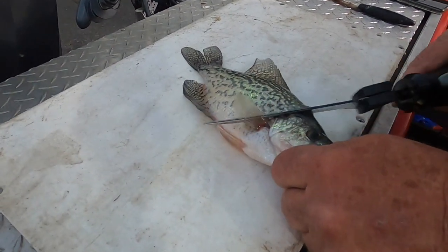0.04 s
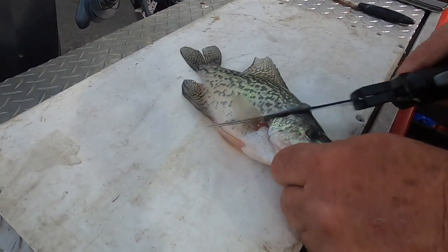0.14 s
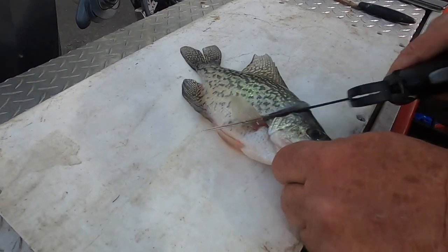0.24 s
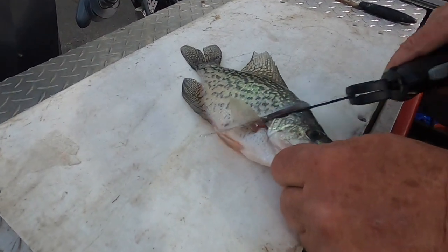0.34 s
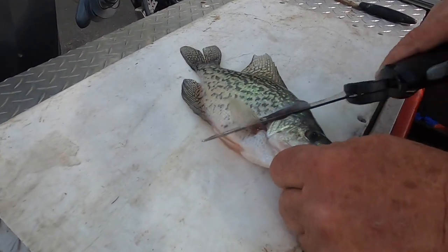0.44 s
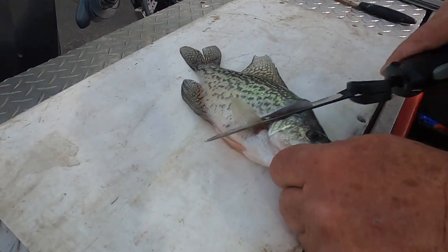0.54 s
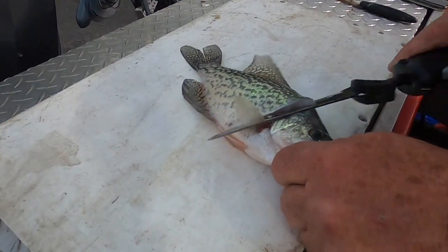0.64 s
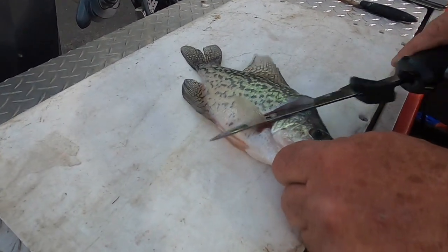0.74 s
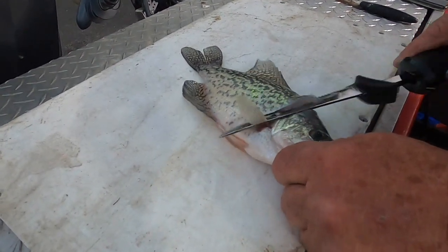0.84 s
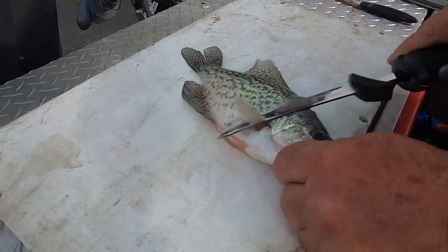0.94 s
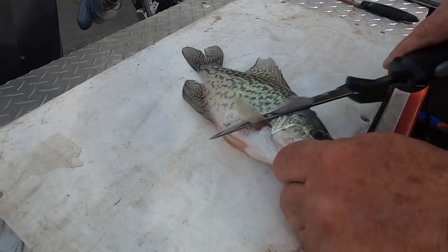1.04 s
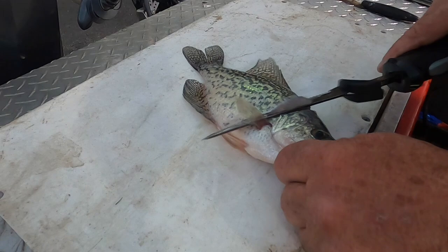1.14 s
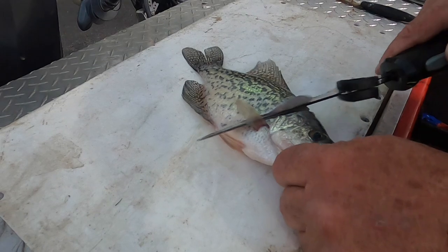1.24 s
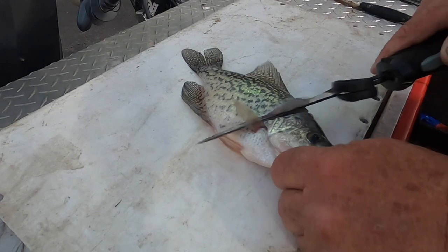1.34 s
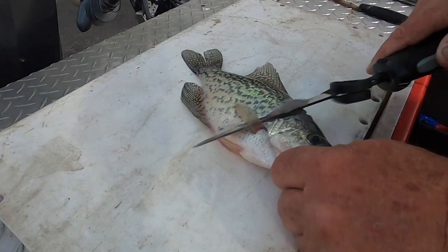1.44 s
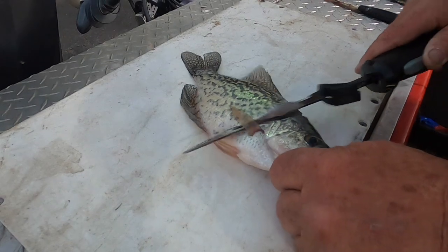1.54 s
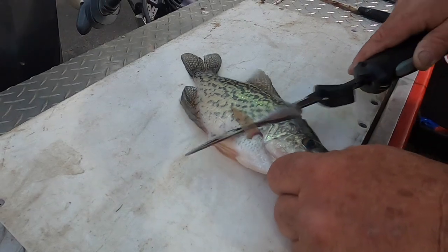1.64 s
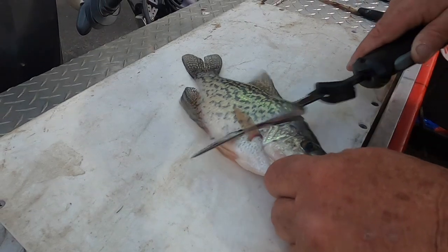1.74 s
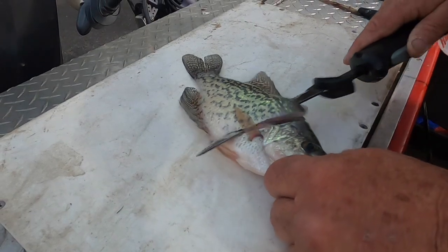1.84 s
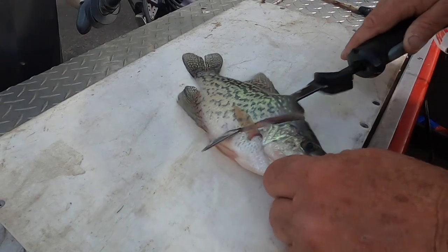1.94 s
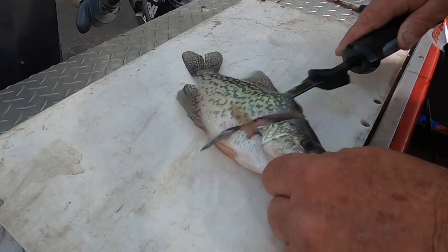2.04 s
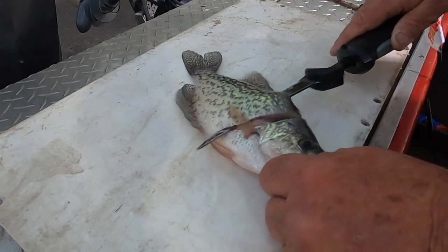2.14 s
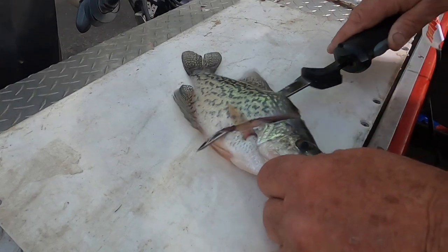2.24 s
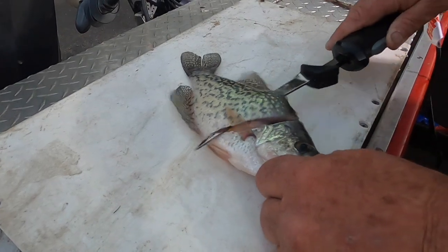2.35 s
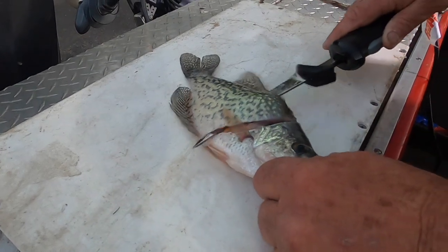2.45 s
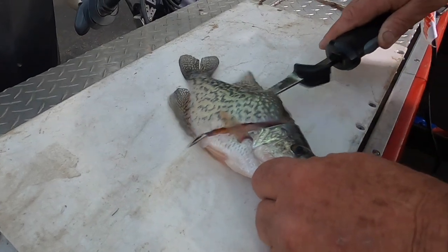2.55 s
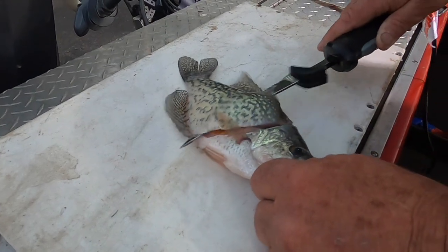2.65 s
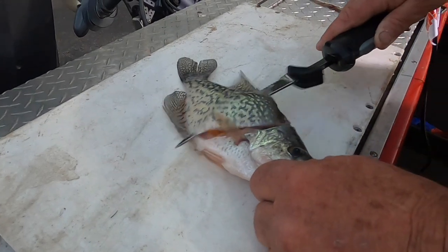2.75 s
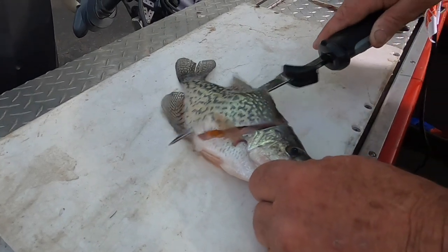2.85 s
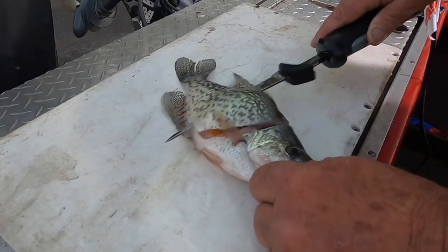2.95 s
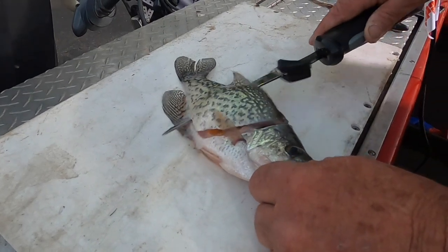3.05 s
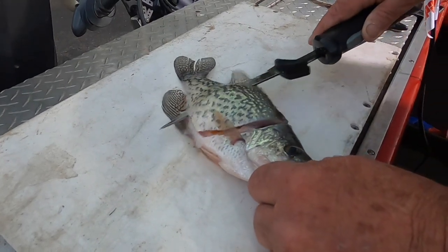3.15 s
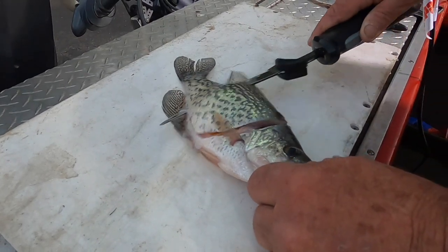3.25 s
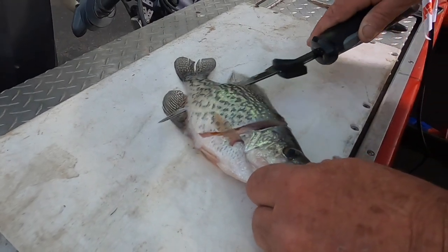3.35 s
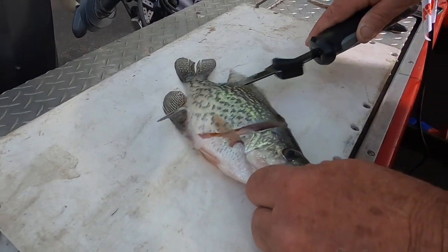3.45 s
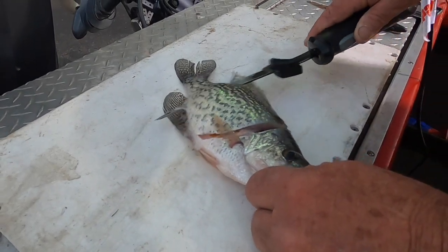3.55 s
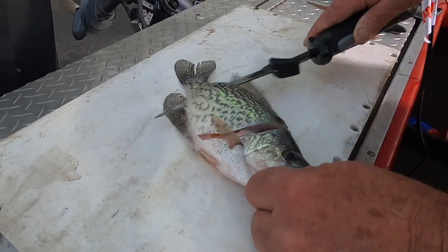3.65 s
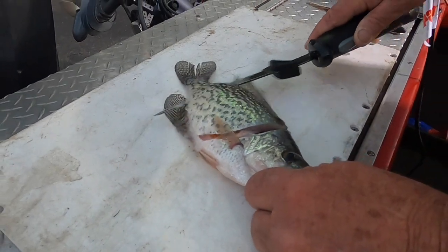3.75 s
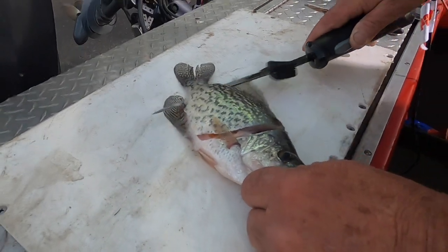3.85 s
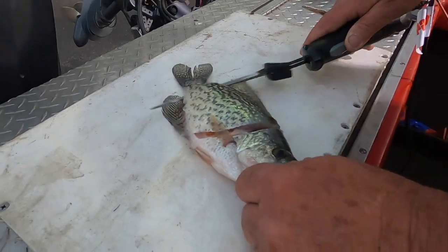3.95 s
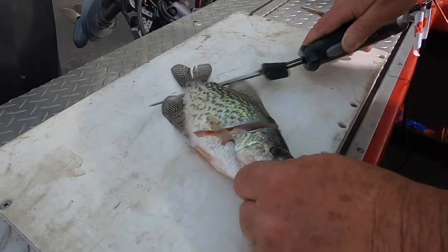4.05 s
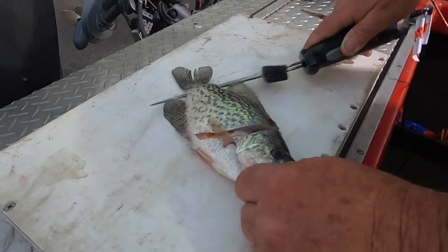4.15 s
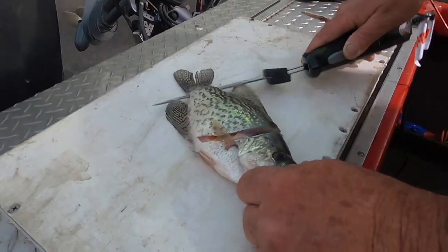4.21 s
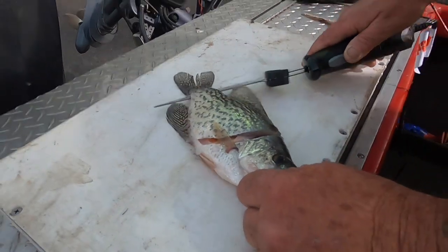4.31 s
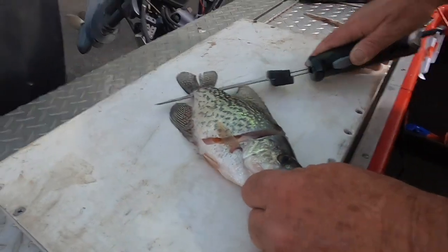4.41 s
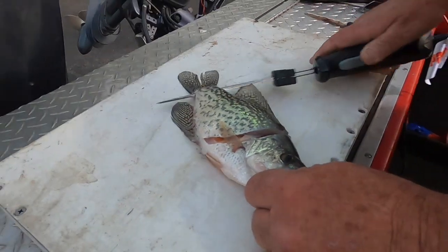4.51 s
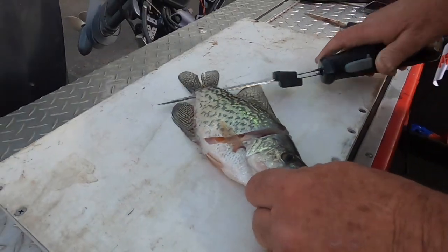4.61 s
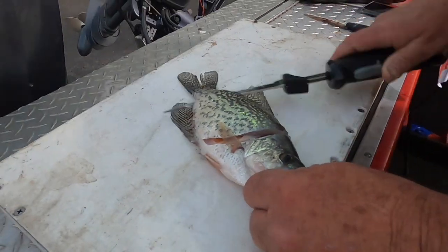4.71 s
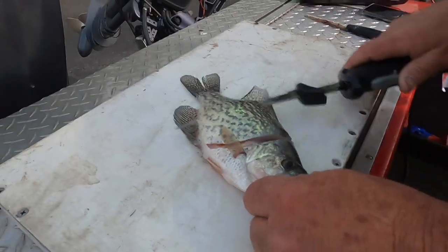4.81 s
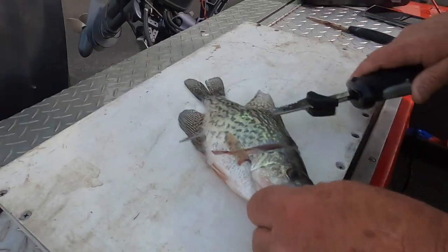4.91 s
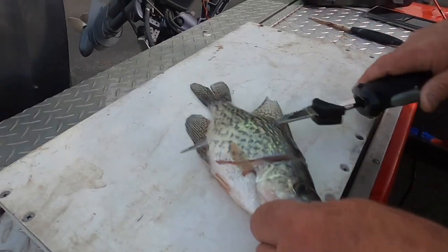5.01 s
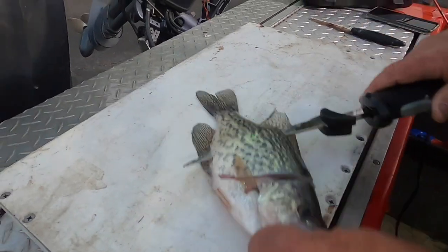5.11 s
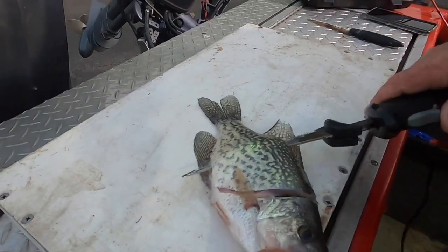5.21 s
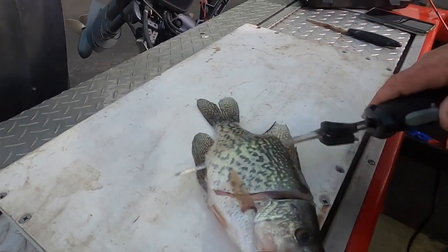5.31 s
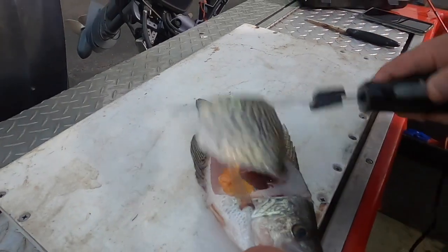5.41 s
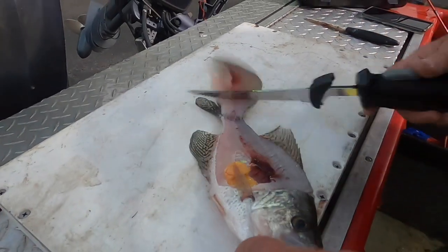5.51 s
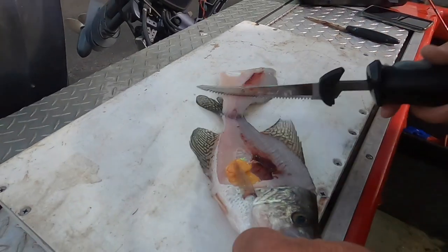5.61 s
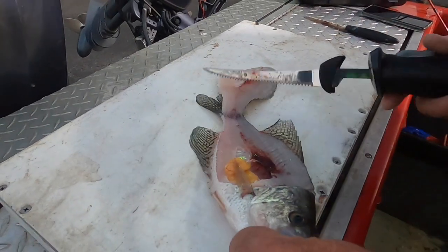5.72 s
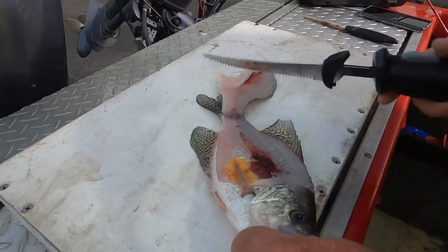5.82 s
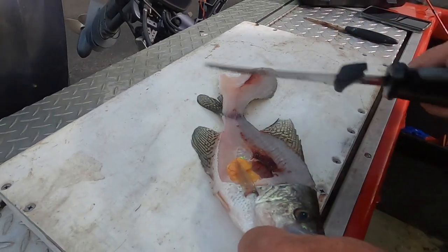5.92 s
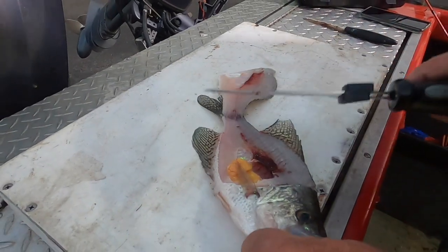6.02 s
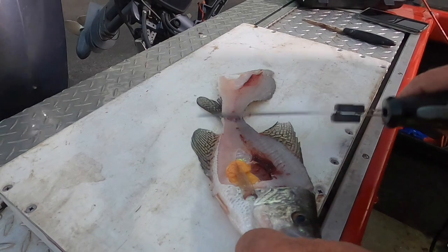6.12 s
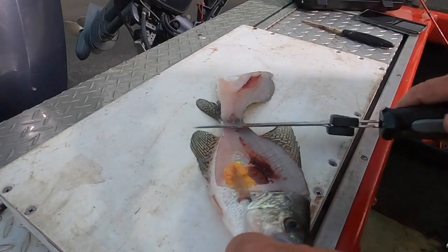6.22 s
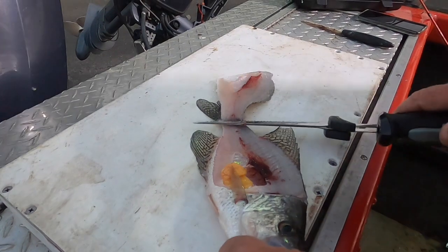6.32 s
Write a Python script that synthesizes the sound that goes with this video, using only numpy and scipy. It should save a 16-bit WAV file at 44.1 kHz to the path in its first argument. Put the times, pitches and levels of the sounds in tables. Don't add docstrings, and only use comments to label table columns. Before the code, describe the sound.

Close up, an electric fillet knife runs with a harsh metallic rattle and gear whine, its twin blades sawing a fish on a hard board. The buzz shifts as the cut deepens, with low thumps and small bony nicks. The motor then winds down, catches and stops. The fillet flips over with sharp wet slaps and dull board bumps, over a faint outdoor hum.

```python
import sys
import numpy as np
from scipy import signal
from scipy.fft import rfft, irfft, next_fast_len
from scipy.io import wavfile

SR = 44100
rng = np.random.default_rng(int(sys.argv[2]) if len(sys.argv) > 2 else 0)


def attenuation_scalar(level_db):
    decades = np.asarray(level_db, float) / 20
    return 10 ** decades


def wrap_up_sound(samples):
    columns = np.atleast_2d(samples).T
    tamed = np.clip(columns, -1, 1)
    steps = np.round(tamed * 32767).astype(np.int16)
    wavfile.write(sys.argv[1], SR, steps)


N = 280917
T = np.arange(N) / SR

# time [s], speed [turns/s].
CAM = [(0, 35.35), (.45, 34.92), (.7, 35.59), (.95, 34.99), (1.45, 34.83), (1.95, 34.3), (2.45, 34.77),
       (2.9, 34.23), (3.25, 34.63), (3.65, 34.46), (4.05, 34.66), (4.58, 35), (4.8, 29.7), (5.0, 23.5),
       (5.35, 13), (6.4, 13)]
# time [s], level [dB], brightness [dB/octave].
EFFORT = [(0, -30, -1), (.15, -30, 0.5), (.5, -29, 0), (.72, -31.5, 0), (.8, -30.5, -1.5), (.9, -29.5, 1.5),
          (1.1, -29.5, 0), (1.3, -29, 1), (1.55, -29.5, .5), (1.75, -29, 1), (2.1, -28.5, 0), (2.5, -28, 0),
          (2.85, -27.5, 0), (3.15, -28, -1), (3.7, -27, -0.5), (4.0, -27.5, 0), (4.3, -28, -1),
          (4.55, -27, 0)]
RUNNING_TURNS_PER_S = 35
BURIED_S = 1.69
SWITCH_OFF_S, SNAG_S, STOP_S = 4.566, 5.015, 5.335


def rms_one(x):
    return x / np.sqrt(np.mean(x ** 2) + 1e-20)


def in_time(rows):
    s, *columns = np.transpose(rows)
    return [np.interp(T, s, c) for c in columns]


def at_hz(points, hz):
    points = np.array(points)
    return np.interp(np.log(hz), np.log(points[:, 0]), points[:, 1])


def after(s, ramp_s=0.013):
    return np.clip((T - s) / ramp_s + .5, 0, 1)


def humps(rows):
    t = T[::16]
    gain = 0
    for s, db, rise, fall in rows:
        drop = np.where(t < s, (s - t) / abs(rise), (t - s) / abs(fall))
        gain = gain + attenuation_scalar(db - 20 * drop)
    return np.interp(T, t, gain)


def drift(rate_hz):
    r = np.exp(-80 * np.pi * rate_hz / SR)
    slow = signal.lfilter([1], [1, -2 * r, r * r], rng.standard_normal(N // 40 + 2002))[2000:]
    return np.interp(np.arange(N) / 40, np.arange(len(slow)), rms_one(slow - slow.mean()))


def band(x, low_hz, high_hz):
    edges_hz = [low_hz, min(high_hz, .45 * SR)]
    return signal.sosfilt(signal.butter(2, edges_hz, "band", fs=SR, output="sos"), x)


def resonate(x, modes):
    out = x.copy()
    for hz, width_hz, level_db in modes:
        r = np.exp(-np.pi * width_hz / SR)
        poles = [1, -2 * r * np.cos(2 * np.pi * hz / SR), r * r]
        out += attenuation_scalar(level_db + 5.0) * signal.lfilter([(1 - r * r) / 2, 0, (r * r - 1) / 2], poles, x)
    return out


def grains(per_s, spread_db):
    draw = rng.uniform(-1, 1, (2, N)) * SR / per_s
    out = np.zeros((2, N))
    born = abs(draw) < 1
    size_db = spread_db * np.minimum(-np.log(abs(draw[born]) + 1e-12), 4)
    out[born] = np.sign(draw[born]) * attenuation_scalar(size_db)
    return rms_one(out)


def sliding(turns, width_hz, gate):
    lowpass = signal.butter(2, width_hz / 2, fs=SR, output="sos")
    along, across = signal.sosfilt(lowpass, gate * grains(6000, spread_db=1.5))
    return rms_one(along * np.cos(2 * np.pi * turns) + across * np.sin(2 * np.pi * turns))


def lagged(left, right):
    lag_s = 52e-6
    size = next_fast_len(N)
    turn = np.exp(-2j * np.pi * np.fft.rfftfreq(size, 1 / SR) * lag_s)
    return np.array([irfft(rfft(left, size) * turn, size)[:N], right])


def coast():
    release_s = 0.14
    halvings = np.log2(RUNNING_TURNS_PER_S / in_time(CAM)[0]) * (T > SWITCH_OFF_S)
    halt_db = 396 * np.clip(T - STOP_S, 0, .3)
    freed, caught = after(SWITCH_OFF_S + release_s / 2, release_s), after(SNAG_S)
    loss_db = -7 * freed - 4 * caught - 13 * halvings - halt_db
    dulling = -0.79 * freed - 0.72 * caught - 0.34 * halvings
    return loss_db, dulling


def reversals(turns, weak_db, scatter_db, sharp):
    stroke = np.floor(2 * turns + .5).astype(int)
    scatter = np.clip(rng.standard_normal(500), -1.5, 1.5)[stroke]
    strength_db = scatter_db * scatter + weak_db * (stroke % 2) * (1.06 + 0.61 * after(BURIED_S, 0.36))
    loaded = 1 - .7 * after(SWITCH_OFF_S + .1, .1)
    angle = 4 * np.pi * turns
    lean = .3
    return attenuation_scalar(loaded * strength_db) * np.exp(loaded * sharp * (np.cos(angle + lean * np.cos(angle)) - 1))


def air():
    # frequency [Hz], level [dB].
    hum_colour = [(59, -46), (100, 6.5), (164, -8.5), (346, -22.5), (630, -14), (859, -18.5), (1060, -13.5),
                  (2180, -28.5), (2680, -36), (8010, -42), (14000, -61.5)]
    chirr_hz = 2700
    mid, side = rng.standard_normal((2, N))
    colour = attenuation_scalar(at_hz(hum_colour, np.fft.rfftfreq(N, 1 / SR) + 1))
    mid, side = rms_one(irfft(rfft([mid, side]) * colour, N))
    hum = (mid + 0.5 * side * [[1], [-1]]) * attenuation_scalar(-50 + 2.0 * drift(3.3))
    chirr_db = -67.5 - 20 * np.clip(6.2 - T, 0, .3) + 3.0 * drift(7)
    return hum + rms_one(band(rng.standard_normal(N), chirr_hz - 70, chirr_hz + 70)) * attenuation_scalar(chirr_db)


def rumble():
    # start [s], peak [dB].
    shakes = [(0.314, -41), (0.437, -46), (0.709, -44), (0.931, -49), (1.146, -46), (1.376, -32),
              (1.644, -29), (1.978, -25), (2.524, -38), (2.682, -33.5), (3.696, -41), (4.17, -44.5),
              (4.385, -30)]
    # time [s], deep level [dB], dull level [dB], lead-in [s per 20 dB].
    bump_rows = [(4.62, -44.5, -38, -0.9), (4.871, -37, -58, 1), (5.03, -44, -60, -1.5), (5.2, -46, -52, 0),
                 (5.361, -46, -57, 0.5), (5.555, -50, -57, 1.5), (5.633, -42, -52, -0.2),
                 (5.65, -25.5, -48, 0), (5.69, -27.5, -48, -0.24), (5.966, -44, -44, 0.12),
                 (6.034, -36, -37.5, 0.07), (6.066, -38, -37, 0.04), (6.112, -27, -30.5, 0),
                 (6.155, -33, -39.5, -0.12), (6.181, -31, -47, -0.5), (6.239, -35.5, -64, -1),
                 (6.315, -34, -62, -1.26)]
    lag_s, rise_s, fall_s = 0.043, 0.086, 0.212
    flex_hz, flex_fall_s, bump_fall_s = 55.5, 0.099, 0.07
    deep, dull = rng.standard_normal((2, N))
    shaken = attenuation_scalar(-48 - 5 * after(SNAG_S, .2))
    shaken = shaken + humps([(s + lag_s, db - 8.0, rise_s, fall_s) for s, db in shakes])
    flex = 0
    for s, db, _, rise in bump_rows:
        flex = flex + humps([(s, db, rise, flex_fall_s)]) * np.cos(2 * np.pi * flex_hz * (T - s))
    dull_gain = attenuation_scalar(-60.5) + humps([(s, db, rise, bump_fall_s) for s, _, db, rise in bump_rows])
    bumps = flex + dull_gain * rms_one(band(band(dull, 47, 188), 40.4, 1350))
    low_end = shaken * rms_one(band(deep, 33.4, 65.0)) + bumps
    apart = attenuation_scalar(-26) * np.roll(low_end, 900)
    return np.array([low_end + apart, low_end - apart])


def lumps():
    # time [s], peak [dB], frequency [Hz].
    jams = [(1.47, -28.5, 105), (1.72, -33, 109), (1.77, -36, 203), (1.97, -32, 170), (2.07, -35, 98.6),
            (2.28, -33, 210.1), (2.4, -30.5, 173), (2.54, -32, 164), (2.69, -31, 104.8), (2.93, -34, 160.1),
            (3.03, -31, 124.6), (3.28, -32.5, 190), (3.38, -31, 127.6), (3.6, -32, 139.7), (3.72, -36, 180),
            (3.95, -33, 140), (4.08, -28, 174.4), (4.16, -25, 158), (4.25, -28.5, 141.3), (4.3, -31.5, 163),
            (4.405, -31, 75)]
    length_s = 0.029
    out = np.zeros(N)
    for s, peak_db, hz in jams:
        span = slice(round((s - .12) * SR), round((s + .12) * SR))
        since = T[span] - s
        out[span] += attenuation_scalar(peak_db + 2.5) * np.exp(-(since / length_s) ** 2) * np.cos(2 * np.pi * hz * since)
    return out


def knocks():
    # time [s], peak [dB], frequency [Hz].
    thuds = [
        (5.96, -33.5, 80),
        (5.995, -37, 130),
        (6.036, -29, 70),
        (6.06, -30, 69.4),
        (6.105, -24, 110),
        (6.117, -19, 75),
        (6.142, -25, 60),
        (6.167, -20, 55),
        (6.227, -32, 65),
    ]
    # time [s], peak [dB], frequency [Hz], pan [dB].
    snaps = [(5.6275, -35, 2500, 0), (5.633, -31, 2000, -6), (5.639, -33, 3000, 0), (5.685, -20.5, 2700, 3),
             (5.688, -27, 2500, -2), (5.692, -23, 3000, -2), (5.693, -31, 2000, 0), (5.731, -37, 3000, -1),
             (5.7575, -44, 6000, 4), (6.034, -47, 500, 0), (6.067, -37, 600, -2), (6.103, -46, 800, 2),
             (6.173, -39, 1000, 0), (6.205, -41, 750, 0), (6.233, -39, 1700, -1), (5.312, -48, 9000, 2),
             (5.429, -53, 6000, -1), (5.4526, -49, 6000, -3), (5.4895, -42, 6000, -2),
             (5.527, -49, 9000, 0), (5.544, -44, 8000, -1), (5.557, -37, 9000, -3), (5.799, -55, 5000, -3),
             (5.893, -56, 4500, -2), (5.963, -56, 3000, 1), (6.051, -55, 3000, 0), (6.0906, -43, 7000, -1),
             (6.165, -47, 4500, 0), (6.2, -55, 6500, 0), (6.246, -50, 4500, -2), (6.312, -55, 8000, 0),
             (6.3425, -53, 7000, 1)]
    thud_t60_s = 0.087
    out = np.zeros((2, N))
    for s, peak_db, hz in thuds:
        since = T[:SR // 8]
        thud = attenuation_scalar(peak_db + 1.5 - 60 * since / thud_t60_s) * np.sin(2 * np.pi * hz * since)
        out[:, round(s * SR):][:, :SR // 8] -= thud
    for s, peak_db, hz, pan_db in snaps:
        snap = band(band(np.arange(400) == 0, hz / 3, 1.5 * hz), hz / 8, 1.7 * hz)
        gain = attenuation_scalar([[peak_db + pan_db / 2], [peak_db - pan_db / 2]])
        out[:, round(s * SR):][:, :400] += snap / snap.max() * gain
    return out


def slaps():
    # frequency [Hz], width [Hz], level [dB].
    board_modes = [(587, 52, 4), (880, 64, -1), (1100, 48, -8), (1400, 120, -12), (2634, 230, -22)]
    # time [s], peak [dB], brightness [Hz], pan [dB].
    ticks = [(4.598, -31, 5000, -8.5), (4.808, -30, 6500, -2), (5.0, -32, 3300, -2), (4.88, -26, 6040, -2),
             (5.225, -36, 5950, -0.5), (5.312, -49, 9000, 4), (5.453, -57, 4996, -5),
             (5.491, -53, 5000, -4), (5.529, -55.5, 11000, 0), (5.544, -58, 7010, 4),
             (5.558, -51, 9500, -5), (5.692, -34, 5500, -11), (5.729, -39.5, 4900, 8),
             (5.738, -48, 8000, -8), (5.757, -46, 6000, 0), (6.09, -47, 7000, -7), (6.165, -49.5, 3960, -6),
             (6.234, -45, 1700, 0), (6.252, -52, 4500, 9.5), (6.312, -66, 7000, 2)]
    # time [s], peak [dB].
    nicks = [(0.5482, -37), (0.7552, -37), (0.8116, -37), (0.9482, -33), (1.1554, -36), (1.3688, -28),
             (1.5156, -29), (1.5895, -33), (1.851, -34), (2.0807, -32), (2.4828, -38), (2.825, -20),
             (3.0669, -31)]
    # time [s], peak [dB], t60 [s], brightness [Hz], pan [dB].
    landings = [
        (5.628, -29, 0.16, 1240, 1),
        (5.677, -37, 0.067, 2500, -5),
        (5.685, -25, 0.058, 2810, -4),
        (5.685, -22, 0.094, 876, -1),
        (6.11, -44, 0.11, 903, 4),
        (6.107, -24.5, 0.089, 219, 0),
        (6.151, -34, .1, 260, 0),
        (6.173, -37.5, .1, 1300, 3),
        (6.175, -26, 0.13, 200, -1),
    ]
    # time [s], peak [dB], t60 [s], brightness [Hz], pan [dB].
    smears = [(5.46, -65, 0.24, 7500, -6), (5.51, -62, .3, 8000, -7), (5.575, -50, 0.11, 7000, -8),
              (5.86, -63, 0.32, 6000, -5), (6.0, -60, .3, 5000, 0), (6.13, -54, 0.1, 6000, 7),
              (5.638, -32.5, 0.091, 4700, 6.5), (5.82, -57.5, 0.27, 4500, -7), (5.9, -56, .09, 3970, 5),
              (6.02, -48, .25, 1050, 0), (6.12, -44.5, 0.204, 2530, 3), (6.34, -50, .089, 3000, 7)]
    tick_rise_s = 0.0011
    wet = resonate(grains(6000, spread_db=3.5)[0], board_modes)
    rows = [(s, db, tick_rise_s, 0.023, hz, pan) for s, db, hz, pan in ticks]
    rows += [(s, db + 6.0, tick_rise_s / 2, .008, 11000, -5.0) for s, db in nicks]
    rows += [(s, db, 0.0021, *rest) for s, db, *rest in landings]
    rows += [(s, db, 0.093 * t60, t60, *rest) for s, db, t60, *rest in smears]
    out = np.zeros((2, N))
    for s, peak_db, rise_s, t60_s, bright_hz, pan_db in rows:
        span = slice(round((s - .06) * SR), min(N, round((s + 0.3) * SR)))
        since = T[span] - s
        shape = np.where(since < 0, np.exp(since / rise_s), attenuation_scalar(-60 * since / t60_s))
        sound = rms_one(band(wet[span], bright_hz / 4, 1.26 * bright_hz)) * shape
        out[:, span] += attenuation_scalar(peak_db - 5.5) * sound * attenuation_scalar([[pan_db / 2], [-pan_db / 2]])
    return out


def thump(turns):
    # time [s], pressure [dB], slack [dB].
    press = [(0, -46, 1), (.26, -38, 4), (.47, -29, -7.5), (.6, -31.5, -12), (.77, -40, -11),
             (.88, -34, -7), (1.18, -42.5, 3), (1.43, -24, -9), (1.54, -38, 4), (1.66, -28.5, -4),
             (2.1, -34, -2), (2.4, -30.5, -5.5), (2.75, -35, -0.5), (3.15, -39.5, 4), (3.4, -32.5, -1.5),
             (4.15, -33.5, 1), (4.55, -33.5, -2), (4.75, -59, 13)]
    # cam multiple, level [dB].
    stroke_orders = [(1, -64), (3, 2.5), (4, -2), (5, -4.5), (6, -5.5), (8, -0.5), (9, -7.5), (10, -8.5),
                     (11, -12), (12, -7.5), (13, -17), (14, -8), (15, -16), (25, -8), (26, -8), (27, -5.5),
                     (31, -9.5), (33, -11.5)]
    # cam multiple, time [s], level [dB],
    # spread [s per 20 dB].
    singing = [(4, 3.65, -37, 0.85), (4, 4.0, -34, 0.3), (10, 3.6, -42.5, 1.2), (12, 3.97, -40.5, 1.5),
               (13, 4.1, -34, .2), (14, 4.08, -35, .2), (14, 4.33, -34, .2), (15, 4.14, -40, 0.28),
               (15, 4.33, -38, 0.24)]
    boom_db, slack_db = in_time(press)
    low_db = boom_db + slack_db
    high_db = -43.5 + 0.26 * (low_db + 35.5) + 2 * T - 25 * after(SWITCH_OFF_S + 0.091, 0.28)
    wobble = turns + .004 * drift(8)
    boom = -np.sqrt(2) * np.cos(4 * np.pi * wobble - .5)
    loose = rng.standard_normal((2, N)) * (.5 + reversals(turns, weak_db=4.5, scatter_db=1.5, sharp=0.23))
    orders = [-attenuation_scalar(db + 1.8 * drift(4.0)) * np.cos(2 * np.pi * k * wobble) for k, db in stroke_orders]
    share = attenuation_scalar(-0.5 + 0.93 * drift(5.4))
    total = np.sqrt(1 + share ** 2)
    low = (rms_one(sum(orders[:5])) + share * rms_one(band(loose[0], 56, 181))) / total
    high = (rms_one(sum(orders[5:])) + .9 * share * rms_one(band(loose[1], 222, 670))) / total
    fade = np.clip((press[-1][0] - T) / 0.097, 0, 1)
    low = fade * (attenuation_scalar(boom_db) * boom + attenuation_scalar(low_db) * low)
    high = fade * attenuation_scalar(high_db) * high
    running = 1 - after(SWITCH_OFF_S, .1)
    for k, s, db, spread in singing:
        high -= running * humps([(s, db, spread, spread)]) * np.cos(2 * np.pi * k * wobble)
    return np.array([low + high * attenuation_scalar(-0.25), low + high * attenuation_scalar(1.5)])


def whine(turns):
    # shaft multiple, level [dB].
    mesh_tones = [(6, -17), (9, -2.5), (10, -3.5), (12, 4)]
    # shaft multiple, level [dB].
    rasp_bands = [(12, -13.5), (17, 0)]
    gear_ratio = 8.325
    loss_db, buried = coast()[0], after(BURIED_S, 0.35)
    shaft_db = -47 - 7 * buried + 1.3 * loss_db + 2.3 * drift(4.8)
    regrip_db = -4 * np.exp(-((T - 1.7) / 0.2) ** 2)
    mesh_db = -43 + buried + 2.9 * loss_db + regrip_db
    mesh_db += -4.0 * (1 - after(0.42, 0.35)) - 5.0 * after(SWITCH_OFF_S)
    rasp_db = -43 + 12.5 * after(SWITCH_OFF_S, .2) + 1.08 * loss_db + 4 * drift(14)
    rasp_db += -6 * after(SWITCH_OFF_S + .27, .1) + 5 * after(SNAG_S)
    gate = .8 + reversals(turns, weak_db=-6, scatter_db=2.5, sharp=1.2)
    shaft = gear_ratio * turns + .006 * drift(20)
    mesh = 0
    for k, level_db in mesh_tones:
        if k > 8:
            level_db = level_db - 18.5 * (buried - .5) * np.log2(k / 10) + .8 * drift(4)
        mesh = mesh + attenuation_scalar(level_db) * np.sin(2 * np.pi * k * shaft)
    rasp = sum(attenuation_scalar(level_db) * sliding(k * shaft, 430, gate) for k, level_db in rasp_bands)
    tone = np.sqrt(2) * (attenuation_scalar(shaft_db) * np.sin(2 * np.pi * shaft) + attenuation_scalar(mesh_db) * mesh)
    tone = (tone + attenuation_scalar(rasp_db) * rasp) * (1 - after(STOP_S, .06))
    return np.array([tone * attenuation_scalar(-1.2), tone * attenuation_scalar(3.0)])


def blade(turns):
    # time [s], frequency [Hz], level [dB].
    free_end = [(0, 1684, -32), (.5, 1550, -38.5), (.75, 1184, -48), (1.3, 1261, -57), (1.7, 890, -35),
                (2.1, 975, -33.5), (2.55, 1171, -32), (2.95, 1432, -35.5), (3.3, 1400, -36),
                (3.6, 1097, -48), (4.3, 1001, -50), (4.6, 994, -36), (4.7, 980, -87)]
    # time [s], frequency [Hz], level [dB], spread either side [s per 20 dB].
    swell = [
        (.45, 2950, -37, 0.5),
        (1.25, 2920, -31.5, 0.26),
        (1.6, 2748, -41, 0.5),
        (2.3, 2918, -37.5, 4.5),
        (3.5, 3950, -38, 0),
        (4.0, 3950, -31, 0.33),
        (4.35, 3950, -33, 0.2),
        (4.8, 3145, -44, 0.5),
        (4.9, 3100, -46, .08),
        (5.0, 2900, -45, 0.02),
    ]
    teeth = [(.95, 5000, -34, .3), (1.35, 5200, -38, .3), (1.62, 5100, -31, .4), (2.4, 4950, -38, .5),
             (3.0, 5050, -35, .6), (3.8, 5100, -35, .4), (4.62, 5000, -31, .1), (4.885, 5040, -36, .04),
             (4.94, 5000, -37, .025), (4.975, 5200, -36, .025), (5.003, 5050, -39, .012),
             (5.018, 5050, -70, .01), (5.024, 2000, -70, .01), (5.05, 1950, -50, .15),
             (5.13, 2420, -52, .06), (5.22, 2250, -60, .1), (5.815, 4550, -64, .025),
             (5.84, 4500, -63, .02)]
    glint = [
        (.3, 10400, -59, 1.5),
        (.85, 10500, -62, .3),
        (1.7, 7530, -40, .6),
        (2.3, 6950, -34.5, 0.59),
        (4.0, 7360, -54, 1.5),
        (4.3, 6950, -38, 0.37),
    ]
    growl = [
        (3.75, 450, -35, .2),
        (4.06, 455, -29, .08),
        (4.13, 470, -34, .08),
        (4.2, 440, -32, .08),
        (4.33, 500, -31, 0.097),
        (4.45, 470, -35, 0.12),
    ]
    drum = [
        (.33, 139.6, -30.5, -0.44),
        (.52, 199.8, -42, -0.24),
        (3.65, 149.8, -37, -0.1),
        (4.21, 148.6, -36, 0.5),
    ]
    hum_rings = [(.12, 1222, -31.5, 0.05), (.45, 1250, -37.5, .4), (.6, 1200, -52, 0.35),
                 (.95, 620, -45, 0.5), (1.2, 599.8, -39.5, 0.2), (1.47, 500, -36.5, 0.24),
                 (1.9, 422.5, -38, 0.35), (2.1, 402.3, -39, 0.3), (2.94, 400, -29, 0.2),
                 (3.6, 339, -39, 0.3), (4.2, 320, -40.5, -0.1)]
    gate = .4 + reversals(turns, weak_db=-3, scatter_db=1.6, sharp=1.5)
    hz, level_db = in_time(free_end)
    out = sliding(np.cumsum(hz) / SR, 190, gate) * attenuation_scalar(level_db)
    sheen_hz = 7800 + 180 * np.minimum(T, 3.6)
    sheen_db = -27 + in_time(EFFORT)[0] + 1.4 * coast()[0]
    out += sliding(np.cumsum(sheen_hz) / SR, 500, gate) * attenuation_scalar(sheen_db)
    held = 1 - after(SNAG_S + 0.025, 0.073)
    for rows, width_hz in (swell, 400), (teeth, 350), (glint, 450), (growl, 100), (drum, 60), (hum_rings, 220):
        hz = in_time(rows)[0]
        gain = humps([(s, db, spread, spread) for s, _, db, spread in rows])
        if rows is not teeth:
            gain = gain * held
        out += sliding(np.cumsum(hz) / SR, width_hz, gate) * gain
    return np.array([out * attenuation_scalar(-1.5), out * attenuation_scalar(-0.5)])


def clacks(turns, weak_db, scatter_db):
    at = np.flatnonzero(np.diff(np.floor(2 * turns + .04)))
    out = np.zeros(N)
    out[at] = attenuation_scalar(weak_db * (np.arange(len(at)) % 2) + scatter_db * rng.standard_normal(500)[:len(at)])
    return rms_one(out)


def recurring(turns):
    place = (turns % 1 * SR / RUNNING_TURNS_PER_S).astype(int)
    worn = grains(20000, spread_db=2.4)[:, place]
    change = 1.5 * drift(.5)
    return worn[0] * np.cos(change) + worn[1] * np.sin(change)


def rattle(turns):
    # frequency [Hz], width [Hz], level [dB].
    housing_modes = [(914, 46, -6), (1400, 210, -1), (1806, 170, -2), (2500, 420, -1.5), (2950, 62, -5.5),
                     (3950, 130, -9), (4930, 290, -7.5), (8550, 520, -8), (10400, 400, -11.5),
                     (14100, 1100, -14)]
    # frequency [Hz], level [dB per Hz].
    rattle_colour = [(150, -34), (250, -4), (277, -10), (313, -11.5), (413, -7), (718, -3), (898, 2.5),
                     (1410, -2), (1590, -5.5), (2530, 1.5), (4480, -0.5), (5060, 3), (8650, -10.5),
                     (13800, -33.5), (15600, -31)]
    # frequency [Hz], level [dB].
    caught_colour = [(500, -1.5), (1000, 1), (2100, 3), (3000, 1), (5000, 3), (7000, 0), (12000, 2)]
    # frequency [Hz], left-right likeness [0..1].
    likeness = [(100, .97), (1000, .95), (3000, .9), (4500, .82), (7000, .68), (10000, .45), (14000, .2)]
    # frequency [Hz], left over right [dB].
    left_lean = [(100, 16), (400, -1), (1400, -3), (2800, -1.4), (5600, -2.5), (9500, -6.5), (14000, -13)]
    repeat_share = .35
    dip_hz, dip_width_hz, pivot_hz = 4415, 510, 2800
    (effort_db, bright), (loss_db, dulling) = in_time(EFFORT), coast()
    usual_db = np.median(effort_db[:4 * SR])
    unloaded = after(SWITCH_OFF_S, 0.52) - after(SNAG_S + 0.076, 0.17)
    caught = after(SNAG_S)
    gate = .54 + 1.1 * reversals(turns, weak_db=-4, scatter_db=1.4, sharp=1.7)
    contacts = grains(20000, spread_db=2.4)
    contacts[0] = np.sqrt(1 - repeat_share) * contacts[0] + np.sqrt(repeat_share) * recurring(turns)
    contacts = rms_one(gate * contacts)
    contacts -= 0.27 * signal.lfilter(*signal.iirpeak(dip_hz, dip_hz / dip_width_hz, SR), contacts)
    hard = rms_one(band(clacks(turns, weak_db=-3.5, scatter_db=2.0), 160, 2620))
    contacts[0] += attenuation_scalar(-21.0) * hard * (T < SWITCH_OFF_S + .06)
    undamped = 1 - 0.54 * caught - 0.37 * unloaded
    near, scattered = contacts + (resonate(contacts, housing_modes) - contacts) * undamped
    left, right = 0, 0
    edges_hz = 250 * 2 ** (np.arange(19) / 3)
    for n, (low, high) in enumerate(zip(edges_hz, edges_hz[1:])):
        hz = np.sqrt(low * high)
        octaves = np.clip(np.log2(hz / pivot_hz), -1.4, 2)
        level_db = at_hz(rattle_colour, hz) + effort_db - usual_db + loss_db + (bright + dulling) * octaves
        level_db += -2.1 * abs(octaves) * unloaded + at_hz(caught_colour, hz) * caught
        level_db += .8 * drift(1.26) + .8 * drift(6.1)
        gain = attenuation_scalar(level_db) * np.sqrt(high - low) * (-1) ** n
        if octaves > 1.4:
            gain = gain / gate ** .35
        alike, lean = at_hz(likeness, hz), attenuation_scalar(at_hz(left_lean, hz) / 2)
        direct = np.sqrt(1 + alike) * gain * rms_one(band(near, low, high))
        other = np.sqrt(1 - alike) * gain * rms_one(band(scattered, low, high))
        left = left + lean * (direct + other)
        right = right + (direct - other) / lean
    both = np.array([left, right])
    steady = np.sqrt(np.mean(both[:, :4 * SR] ** 2))
    return both / steady * attenuation_scalar(usual_db + 4.5)


def scene():
    turns = .285 + np.cumsum(in_time(CAM)[0]) / SR
    surroundings = air() + rumble()
    board = lumps() + knocks() + slaps() + thump(turns)
    knife = whine(turns) + blade(turns) + rattle(turns)
    return lagged(*(surroundings + board + knife))


def roll_off(x):
    return signal.sosfilt(signal.butter(12, 15720, fs=SR, output="sos"), x)


def record(dry):
    mix = signal.sosfilt(signal.cheby2(10, 60, 16150, fs=SR, output="sos"), dry)
    return roll_off(mix)


dry = scene()
out = record(dry)
wrap_up_sound(out)
```